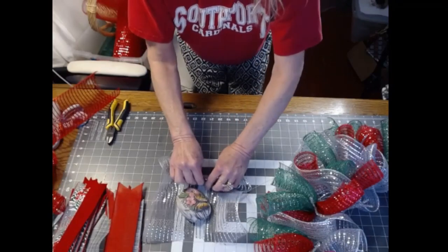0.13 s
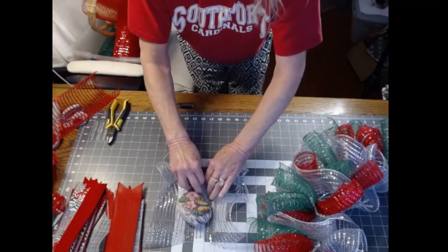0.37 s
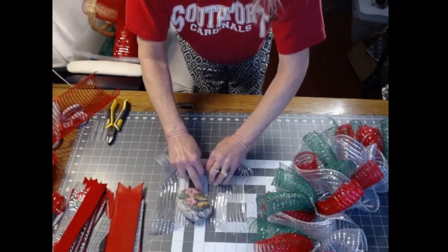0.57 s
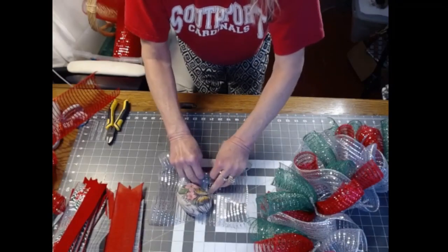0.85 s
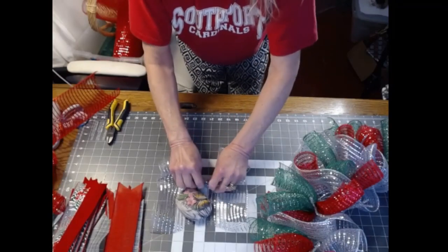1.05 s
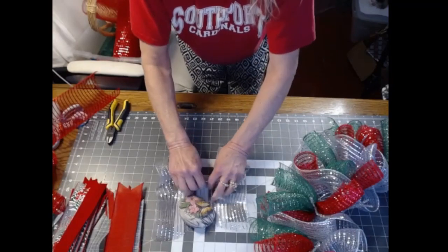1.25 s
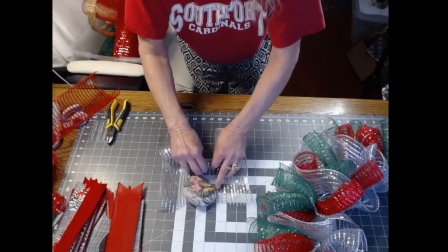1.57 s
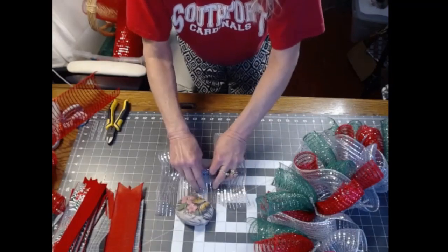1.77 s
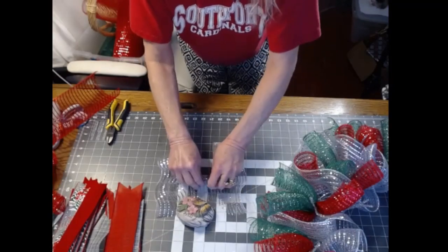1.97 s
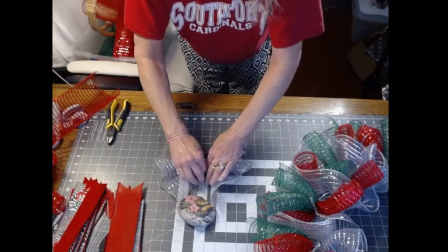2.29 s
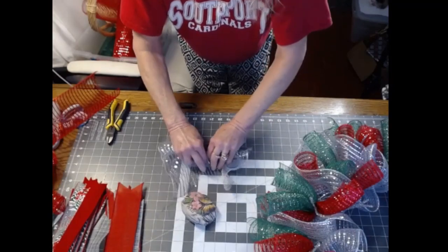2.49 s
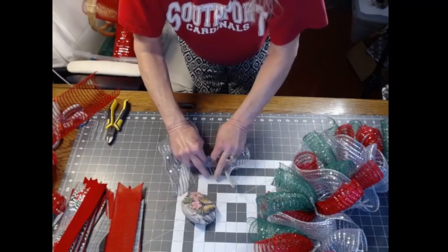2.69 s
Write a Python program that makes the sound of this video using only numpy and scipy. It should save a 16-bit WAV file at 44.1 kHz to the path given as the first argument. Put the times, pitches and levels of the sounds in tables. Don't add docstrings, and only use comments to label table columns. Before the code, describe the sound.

Crinkling plastic mesh in a small quiet room: small sharp ticks, then denser rustling and rubbing over a mat, dull hand bumps rumbling through the table, one wooden knock, and finally fading snaps over low room air.

```python
import sys
import numpy as np
from scipy import signal
from scipy.io import wavfile
from scipy.ndimage import uniform_filter1d

SR = 44100
rng = np.random.default_rng(int(sys.argv[2]) if len(sys.argv) > 2 else 0)


def wav_out(sig):
    wavfile.write(sys.argv[1], SR, np.round(np.clip(np.atleast_2d(sig).T, -1, 1) * 32767).astype(np.int16))


def convert_level_to_amplitude(level_db):
    exponent = np.asarray(level_db, float) / 20
    return 10 ** exponent


N = 125685

# [f/Hz, level/dB per Hz]
AIR_SPECTRUM = [(12, -8), (40, -4), (60, 3.5), (170, -21), (340, -20), (540, -15.5), (1450, -79.5),
                (6350, -29.5), (7790, -21), (8850, -86), (19500, -120)]
# [f/Hz, level/dB, t60/s]
DRONE_MODES = [(247.6, -60, 1.5), (436, -61, .15), (667, -70, .4)]
# [t/s, level/dB]
DRONE_SWELL = [(2.3, -8), (2.6, 2)]
# [f/Hz, likeness/1]
LIKENESS = [(60, 0.94), (250, 1), (500, 0.81), (1000, 0.72), (2000, 0.17), (4000, 0.077), (8000, 1)]
# [t/s, level/dB]
SCRUNCH = [(.42, -60), (.52, -48), (.66, -46.5), (.74, -61), (.9, -52), (1.22, -65.5), (1.25, -48.5),
           (1.3, -49), (1.35, -58), (1.47, -46.5), (1.56, -46.5), (1.61, -62), (1.72, -48.5), (2.05, -65),
           (2.37, -48), (2.54, -53), (2.74, -67), (2.85, -62)]
# [f/Hz, level/dB per Hz]
MESH_SPECTRUM = [(710, -31.5), (1200, -3.5), (2050, -1), (2320, -1.5), (6130, -7.5), (7550, -0.5),
                 (8850, -58.5), (11500, -91), (19500, -120)]
# [t/s, level/dB]
SLIDE = [(0, -57.5), (.42, -54), (.52, -46), (.63, -38), (.74, -48), (1.0, -51), (1.2, -57), (1.27, -54.5),
         (1.36, -50), (1.52, -41.5), (1.67, -50.5), (1.71, -43.5), (1.86, -45), (2.04, -55.5),
         (2.24, -55.5), (2.34, -44), (2.5, -40), (2.62, -58)]
# [f/Hz, level/dB per Hz]
MAT_SPECTRUM = [(120, -13.5), (200, 5), (272, -16), (382, 5), (447, -5.5), (1060, -2), (1420, -22.5),
                (3000, -25.5), (3900, -78.5), (6600, -120)]
# [f/Hz, level/dB, t60/s]
MAT_MODES = [(299, -12.5, 0.17), (338.3, -8.5, .2), (521.7, -13, 0.04), (748, -16.5, 0.1),
             (1053.3, -20, 0.11), (1241, -24, 0.12), (1562, -23, 0.15), (1959, -31.5, 0.048),
             (2824, -25.5, 0.051)]
# [t/s, peak level/dB, f/Hz]
SNAPS = [(0.043, -46, 6860), (0.104, -49, 5700), (0.175, -43, 6050), (0.313, -27, 6500), (.325, -48, 7200),
         (0.348, -36, 3180), (.364, -31.5, 2900), (0.407, -32.5, 5500), (0.428, -52, 5800),
         (0.433, -26.5, 6100), (0.44, -31, 2900), (0.463, -37.5, 6140), (0.481, -50, 2800),
         (0.502, -38, 5000), (0.515, -30, 5030), (0.535, -32, 4000), (0.54, -36, 5000),
         (0.563, -21.5, 5800), (0.57, -35.5, 6000), (.602, -45, 6300), (0.623, -38, 5500),
         (0.758, -32.5, 6600), (0.783, -28.5, 6300), (0.904, -32.5, 3940), (0.953, -37, 6300),
         (0.982, -37.5, 3730), (1.056, -37, 6700), (1.108, -37, 3500), (1.132, -34, 3470),
         (1.196, -48, 6500), (1.227, -44, 2900), (1.251, -40, 5040), (1.267, -27.5, 3500),
         (1.277, -35.5, 4670), (1.283, -31.5, 3500), (1.314, -31, 6430), (1.389, -45.5, 2900),
         (1.429, -38, 2900), (1.627, -22.5, 6300), (1.632, -40.5, 6600), (1.642, -34, 6500),
         (1.694, -30, 6600), (1.71, -40.5, 5200), (1.73, -38.5, 3800), (1.767, -29, 2900),
         (1.819, -25.5, 6240), (1.83, -35, 6000), (1.87, -35, 6300), (1.99, -40, 6900),
         (2.062, -38.5, 6260), (2.127, -39, 3300), (2.18, -36, 5800), (2.259, -41, 5370),
         (2.287, -37.5, 6260), (2.319, -35.5, 2880), (2.372, -28.5, 6300), (2.506, -34, 5400),
         (2.588, -40.5, 5370), (2.65, -39.5, 5000), (2.695, -49, 6000), (2.727, -52, 6000),
         (2.801, -42, 5900), (2.842, -43, 6030)]
# [t/s, level/dB]
PRESS = [(.14, -49), (.2, -39), (.4, -41), (.47, -29.5), (.6, -32.5), (.82, -42.5), (.95, -37.5),
         (1.21, -42), (1.25, -27.5), (1.4, -31), (1.47, -37), (1.67, -33.5), (1.72, -28), (1.96, -41.5),
         (1.99, -51), (2.29, -49.5), (2.42, -29.5), (2.56, -58.5)]
# [t/s, peak level/dB]
THUDS = [(0.19, -21), (0.458, -18.5), (0.521, -44), (0.655, -11), (0.939, -13), (1.236, -49), (1.262, -15),
         (1.349, -21), (1.547, -13), (1.617, -10), (1.694, -9), (1.777, -20), (1.953, -56), (2.312, -13),
         (2.336, -20), (2.391, -13), (2.408, -26), (2.424, -8), (.84, -34.5), (.151, -45)]
# [f/Hz, level/dB, t60/s]
BOARD_MODES = [(60.5, -3.5, 0.21), (77.3, -2.5, 0.18), (91.16, 4, 0.22), (147.4, -3, 0.095),
               (185.2, -8, 0.13), (233.3, -12.5, 0.14), (292.1, -12.5, 0.29), (339.6, -13, 0.057),
               (392, -21.5, 0.033)]
# [t/s, peak level/dB]
KNOCKS = [(1.695, -23.5), (1.887, -16.5), (1.897, -22.5), (1.909, -24), (1.922, -26.5), (1.937, -36),
          (1.957, -41), (2.028, -37.5), (2.436, -34), (2.445, -27), (2.455, -50), (2.49, -31), (2.53, -42)]
# [f/Hz, level/dB, t60/s]
WOOD_MODES = [(216, 5, 0.048), (345.4, 5.5, 0.083), (522, 9.5, 0.065), (531, 17, 0.023), (648, 9, 0.022),
              (714, 2.5, 0.048), (844, -3.5, 0.13), (1054, -1, 0.016)]

AIR_DB, WHINE_HZ, WHINE_DB, PATCHY_DB = -48, 8000, -74.0, 1.0
GRAINS_PER_S, GRAIN_SPREAD_DB, GRAIN_DB, CLUMP_DB = 580, 3.5, -63.5, 5.0
GRAIN_CYCLES, GRAIN_THIN_HZ, GRAIN_TOP_HZ = 7.0, 3200, 8200
SNAP_T60_S, SNAP_BROAD_DB, SNAP_WIDTH = .005, -3.0, 1.3
SNAP_TAIL_S, SNAP_TAIL_DB = .04, -15.0
SLIPS_PER_S, SLIP_SPREAD_DB, RUMBLE_DB = 250, 0.5, 1.5
EVEN_S, EVEN_SHARE = .08, .7
THUD_DB, THUD_SOFT_HZ, THUD_DAMPED = -13.5, 243, 0.65
KNOCK_DB, KNOCK_DULL_HZ, STRIKE_SPREAD_DB, STAND_CUT_HZ = -16.5, 1100, 2.0, 56.7
ROOM_DB, BOARDS_TO_ROOM_DB, ROOM_T60_S, WALL_DULL_HZ = -12, -13.5, .25, 9000
LEFT_DB = -1.3
MIC_CUT_HZ, MIC_STOP_DB, EDGE_HZ, EDGE_DB = 9470, 32.5, 9050, 40
HAZE_HZ, HAZE_TOP_HZ, HAZE_DB, HAZE_FULL_DB, HAZE_S = 9000, 11800, -28.0, -48, .004
PREAMP_HISS_DB, HISS_FROM_HZ = -93, 10400


def rms_one(x):
    return x / np.sqrt(np.mean(x ** 2) + 1e-20)


def in_time(rows):
    return np.interp(np.arange(N) / SR, *np.transpose(rows))


def at_hz(points, hz):
    points = np.array(points)
    return np.interp(np.log(hz), np.log(points[:, 0]), points[:, 1])


def filtered(x, order, hz, kind="low"):
    return signal.sosfilt(signal.butter(order, hz, kind, fs=SR, output="sos"), x)


def drift(rate):
    r = np.exp(-80 * np.pi * rate / SR)
    white = rng.standard_normal(N // 40 + 2002)
    slow = signal.lfilter([1], [1, -2 * r, r * r], white)[2000:]
    return np.interp(np.arange(N) / 40, np.arange(len(slow)), rms_one(slow))


def ring(clicks, hz, t60):
    r = np.exp(-np.log(1000) / (t60 * SR))
    w = 2 * np.pi * hz / SR
    return signal.lfilter([0, np.sin(w)], [1, -2 * r * np.cos(w), r * r], clicks + 1e-18)


def random_clicks(rate, spread_db):
    sizes = convert_level_to_amplitude(spread_db * np.minimum(rng.exponential(1, N), 3)) * rng.choice([-1, 1], N)
    return sizes * (rng.random(N) < rate / SR)


def banded_noise(spectrum, patchy_db):
    out, together = 0, drift(6)
    lowest, highest = spectrum[0][0], spectrum[-1][0]
    edges = lowest * 2 ** np.arange(0, np.log2(highest / lowest) + .2, .4)
    white = rng.standard_normal((2, 2, N))
    for k, (low, high) in enumerate(zip(edges, edges[1:])):
        mid, side = filtered(white[k % 2], 2, [low, high], "band")
        hz = np.sqrt(low * high)
        alike = np.clip(at_hz(LIKENESS, hz), -1, 1)
        gain = convert_level_to_amplitude(at_hz(spectrum, hz) + patchy_db * (together + 1.4 * drift(22.6)))
        out = out + gain * (np.sqrt(1 + alike) * mid + np.sqrt(1 - alike) * side * [[1], [-1]])
    return rms_one(out)


def sing(modes):
    return sum(convert_level_to_amplitude(db) * rms_one(ring(rng.standard_normal(N), hz, t60)) for hz, db, t60 in modes)


def room_air():
    air = convert_level_to_amplitude(AIR_DB) * banded_noise(AIR_SPECTRUM, PATCHY_DB)
    drone = convert_level_to_amplitude(in_time(DRONE_SWELL)) * sing(DRONE_MODES)
    whine = convert_level_to_amplitude(WHINE_DB) * np.sin(2 * np.pi * WHINE_HZ * np.arange(N) / SR)
    return air + drone + whine


def rustle():
    return convert_level_to_amplitude(in_time(SCRUNCH)) * banded_noise(MESH_SPECTRUM, PATCHY_DB)


def crackle():
    vigour_db = in_time(SCRUNCH)
    clicks = random_clicks(GRAINS_PER_S * convert_level_to_amplitude(CLUMP_DB * drift(13)), GRAIN_SPREAD_DB)
    pitches = np.geomspace(2800, 7400, 12)
    dealt = rng.random((12, N)) < .25
    rings = 0
    for k, hz in enumerate(pitches):
        rings = rings + convert_level_to_amplitude(at_hz(MESH_SPECTRUM, hz)) * hz * ring(clicks * dealt[k], hz, GRAIN_CYCLES / hz)
    rings = filtered(rings, 6, GRAIN_TOP_HZ)
    rings = filtered(rings, 2, GRAIN_THIN_HZ, "high")
    return convert_level_to_amplitude(GRAIN_DB + vigour_db - vigour_db.mean()) * rms_one(rings)


def slide():
    rub = convert_level_to_amplitude(in_time(SLIDE) - 6.0) * banded_noise(MAT_SPECTRUM, PATCHY_DB)
    return rub + convert_level_to_amplitude(in_time(SLIDE)) * sing(MAT_MODES)


def snaps():
    out, t = np.zeros(N + 2048), np.arange(2048) / SR
    crack_decay = np.exp(-np.log(1000) * t / SNAP_T60_S)
    tail_decay = np.exp(-np.log(1000) * t / SNAP_TAIL_S)
    shape = crack_decay + convert_level_to_amplitude(SNAP_TAIL_DB) * tail_decay
    for (s, db, hz), noise in zip(SNAPS, rng.standard_normal((len(SNAPS), 2048))):
        burst = noise * shape
        broad = convert_level_to_amplitude(SNAP_BROAD_DB) * filtered(burst, 2, 1800, "high")
        crack = broad + filtered(burst, 1, [hz / SNAP_WIDTH, hz * SNAP_WIDTH], "band")
        start = int(s * SR)
        out[start:start + len(t)] += convert_level_to_amplitude(db) * crack / np.abs(crack).max()
    return out[:N]


def strike(hits, modes, soft_hz):
    s, db = np.transpose(hits)
    chance, out = rng.normal(0, STRIKE_SPREAD_DB, (len(s), len(modes))), 0
    for k, (hz, mode_db, t60) in enumerate(modes):
        clicks = np.zeros(N)
        clicks[(s * SR).astype(int)] = convert_level_to_amplitude(db + mode_db + chance[:, k])
        out = out + (-1) ** k * ring(clicks, hz, t60)
    return filtered(out, 3, soft_hz)


def press():
    slips = [random_clicks(SLIPS_PER_S, SLIP_SPREAD_DB) for _ in range(2)]
    boards = 0
    for k, (hz, db, t60) in enumerate(BOARD_MODES):
        boards = boards + convert_level_to_amplitude(db) * rms_one(ring(slips[k % 2], hz, t60))
    power = uniform_filter1d(boards ** 2, size=int(EVEN_S * SR))
    boards = boards / power ** (EVEN_SHARE / 2)
    return convert_level_to_amplitude(in_time(PRESS) + RUMBLE_DB) * rms_one(boards)


def table():
    damped_modes = np.array(BOARD_MODES) * [1, 1, THUD_DAMPED]
    low = press() + convert_level_to_amplitude(THUD_DB) * strike(THUDS, damped_modes, THUD_SOFT_HZ)
    knock = convert_level_to_amplitude(KNOCK_DB) * strike(KNOCKS, WOOD_MODES, KNOCK_DULL_HZ)
    return filtered(low, 4, STAND_CUT_HZ, "high") + knock


def room(x):
    out, dull = np.zeros((2, N)), np.exp(-2 * np.pi * WALL_DULL_HZ / SR)
    for k, lag in enumerate((rng.uniform(.004, .03, 16) * SR).astype(int)):
        loop, state = x.copy(), [0.]
        gain = np.exp(-np.log(1000) * lag / SR / ROOM_T60_S)
        for i in range(lag, N, lag):
            back, state = signal.lfilter([gain * (1 - dull)], [1, -dull], loop[i - lag:i], zi=state)
            loop[i:i + lag] += back[:N - i]
        out[k % 2] += (loop - x) * (-1) ** (k // 2)
    return out


def scene():
    background = room_air()
    hiss = rustle()
    strands = crackle() + snaps()
    airborne = strands + hiss + slide()
    boards = table()
    balance = convert_level_to_amplitude(np.array([[LEFT_DB / 2], [-LEFT_DB / 2]]))
    wet = convert_level_to_amplitude(ROOM_DB) * room(strands + convert_level_to_amplitude(BOARDS_TO_ROOM_DB) * boards)
    return airborne * balance + boards + wet + background


def roll_off(x):
    return signal.sosfilt(signal.butter(12, 9000, fs=SR, output="sos"), x)


def record(dry):
    slope = signal.cheby2(4, MIC_STOP_DB, MIC_CUT_HZ, fs=SR, output="sos")
    edge = signal.cheby2(16, EDGE_DB, EDGE_HZ, fs=SR, output="sos")
    x = signal.sosfilt(edge, signal.sosfilt(slope, dry))
    treble = filtered(dry, 3, [HAZE_HZ, HAZE_TOP_HZ], "band")
    loudness = np.sqrt(uniform_filter1d(treble ** 2, size=int(HAZE_S * SR)) + 1e-16)
    x = x + convert_level_to_amplitude(HAZE_DB) * treble * np.minimum(loudness / convert_level_to_amplitude(HAZE_FULL_DB), 1)
    hiss = rng.standard_normal(N) + 0.5 * rng.standard_normal((2, N))
    x = x + convert_level_to_amplitude(PREAMP_HISS_DB) * filtered(hiss, 12, HISS_FROM_HZ, "high")
    return roll_off(x)


dry = scene()
out = record(dry)
wav_out(out)
```